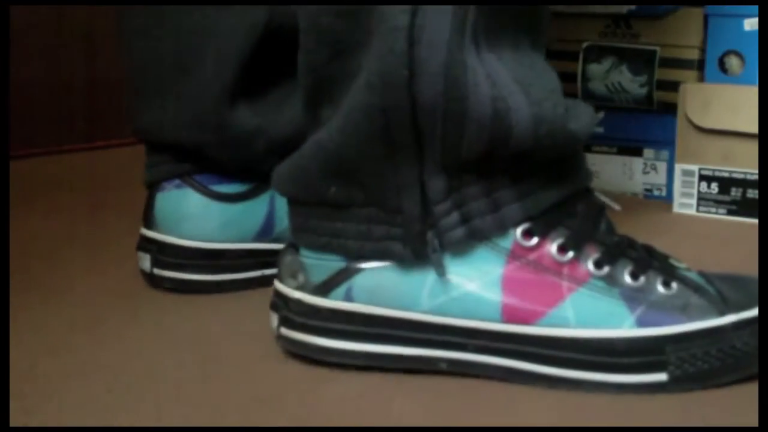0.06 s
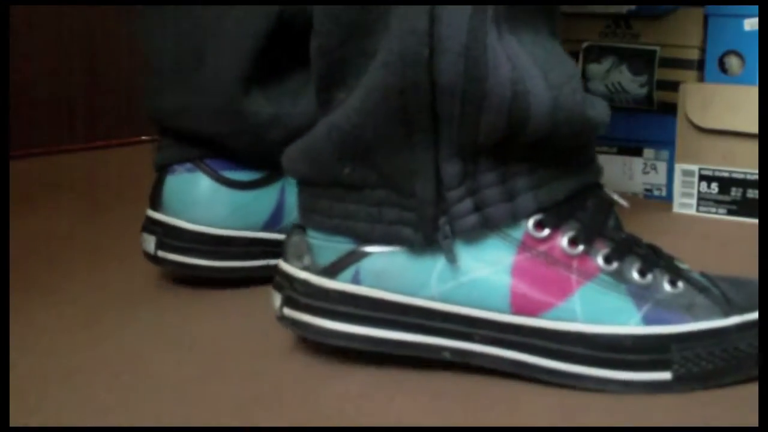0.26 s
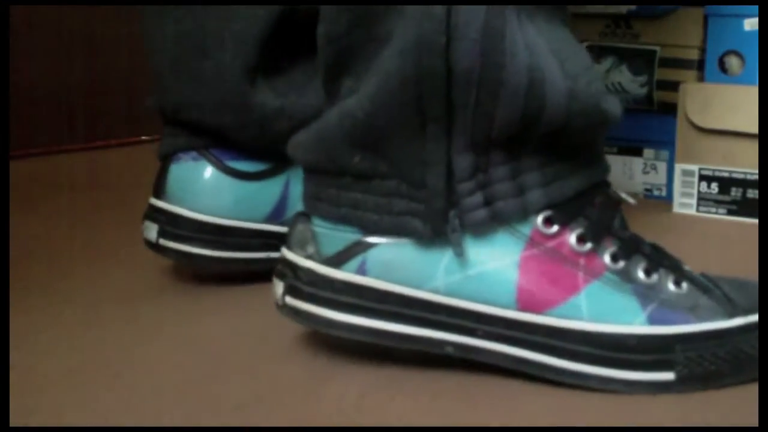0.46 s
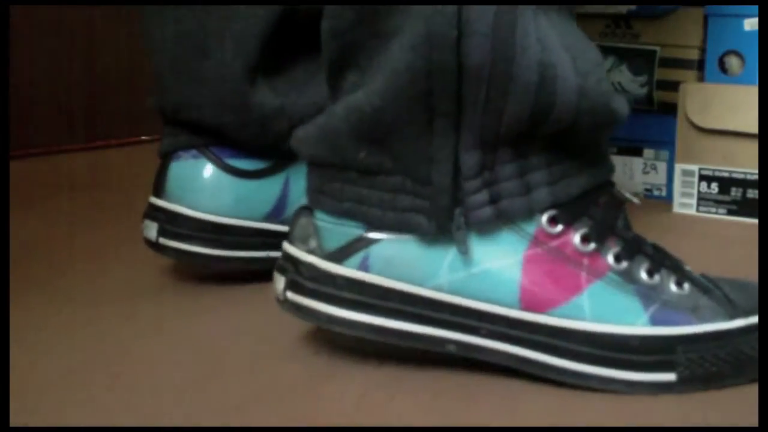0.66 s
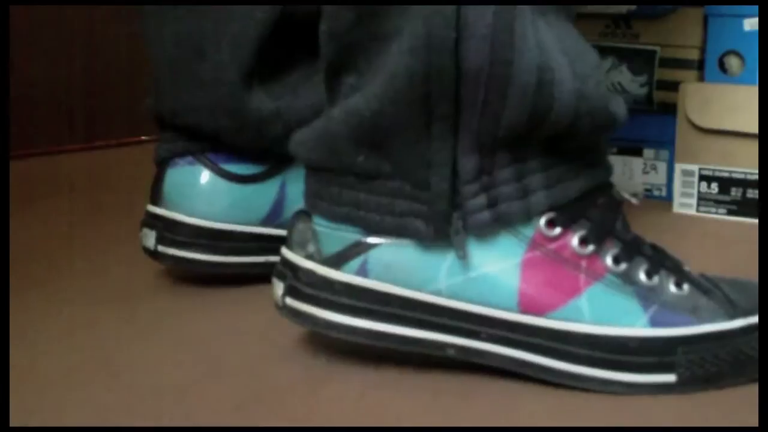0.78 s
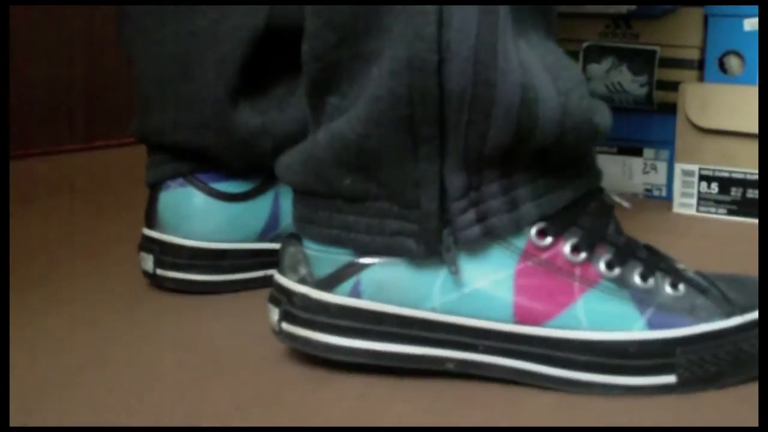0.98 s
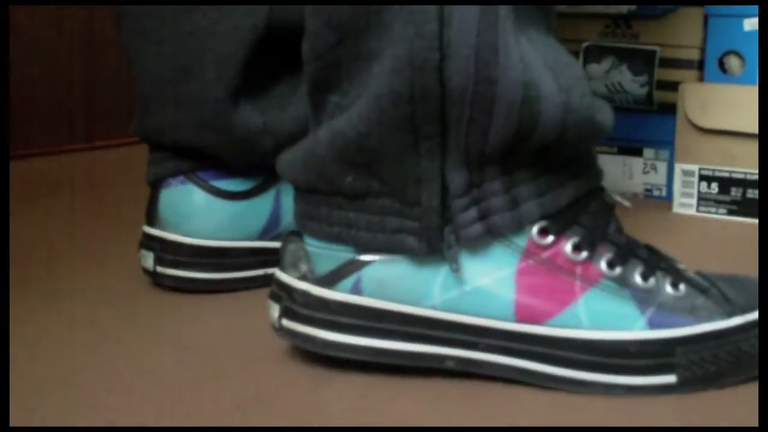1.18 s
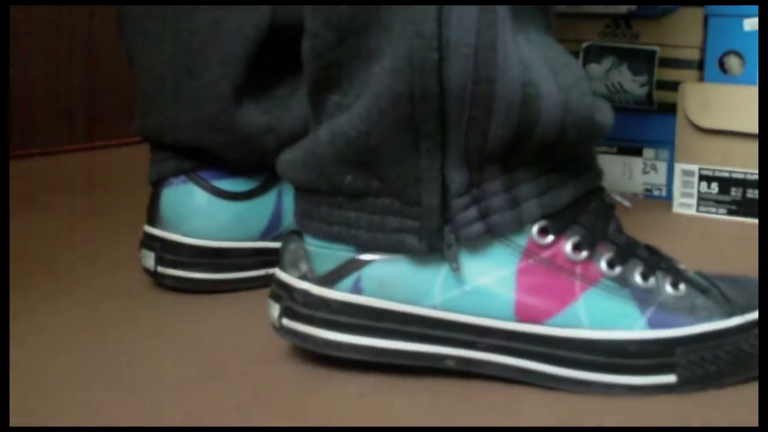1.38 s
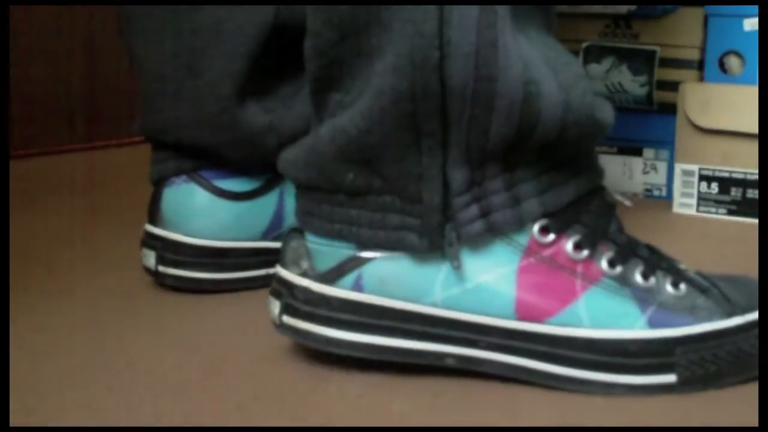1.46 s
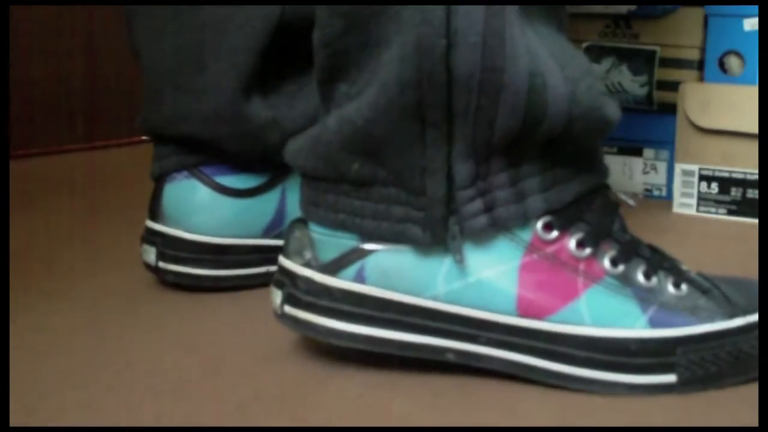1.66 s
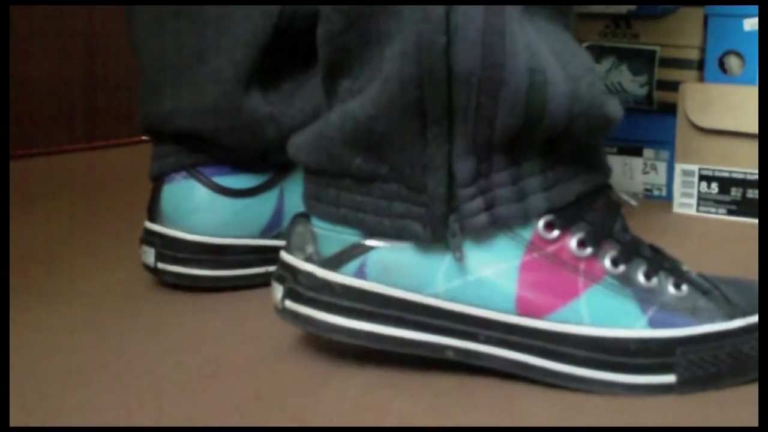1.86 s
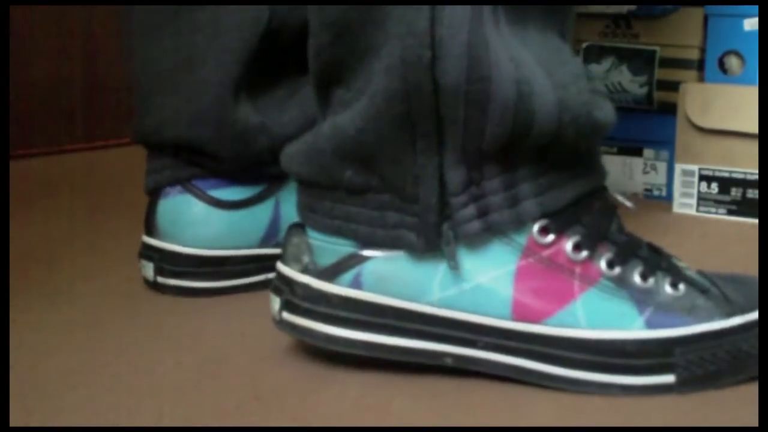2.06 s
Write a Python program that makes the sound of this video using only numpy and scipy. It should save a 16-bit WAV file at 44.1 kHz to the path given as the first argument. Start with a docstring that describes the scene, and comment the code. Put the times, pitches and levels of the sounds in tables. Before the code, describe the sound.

Rubber-soled shoes creak and scuff on a hard floor, with one loud early heel knock.

```python
"""A small room with a hard floor: rubber-soled shoes shift about, close to a small camera microphone.
The sole slips in short bursts of clicks that ring sole and floor; a heel lands and rattles, with knocks around it.
Dust crunches as tiny cracks of noise, and rubber gives thin squeaks made of gliding tones.
The room answers with a short noise-like tail, over steady coloured hiss and faint regular ticks."""
import sys
import numpy as np
from scipy import signal
from scipy.fft import rfft, irfft
from scipy.io import wavfile
from scipy.ndimage import uniform_filter1d

SR = 44100
rng = np.random.default_rng(int(sys.argv[2]) if len(sys.argv) > 2 else 0)


def dump_mix(stems):
    """Bounce the given channels to the path in sys.argv[1] as a 16-bit WAV at rate SR."""
    frames = np.atleast_2d(stems).T  # one column per channel
    limited = np.clip(frames, -1, 1)  # hard clip at full scale
    pcm = np.round(limited * 32767).astype(np.int16)
    wavfile.write(sys.argv[1], SR, pcm)


def amplitude_ratio(level_db):
    """Convert a level in decibels to the matching linear amplitude (field) ratio."""
    exponent = np.asarray(level_db, float) / 20
    return 10 ** exponent


N = 92610  # length of the scene [samples]

# ringing modes of sole and floor: (frequency [Hz], relative level [dB], time to fall by 60 dB [s])
SOLE_MODES = [(438, -20.5, 0.04), (600, -11, 0.021), (700, -9.5, 0.019), (808, -1, 0.023), (913, 2, 0.014),
              (1064, -4, 0.027), (1241, 6.5, 0.015), (1431, 3, 0.019), (1552, -12.5, 0.057),
              (1858, 7.5, 0.011), (2215, -0.5, 0.019), (2597, 0.5, 0.015), (2940, 6, 0.0071),
              (3407, -3.5, 0.013), (3887, -2, 0.01), (4604, -11, 0.011), (4760, -10, 0.0039)]
GAP_JITTER = 0.5  # unevenness of the gaps between slips or cracks (spread of their natural log)


def unit(x):
    """Scale a signal to rms 1."""
    return x / np.sqrt(np.mean(x ** 2))


def walk(rate):
    """Random level, rms 1, that glides to a new value about rate times a second."""
    hold = int(SR / rate)
    steps = np.repeat(rng.standard_normal(N // hold + 1), hold)
    return unit(uniform_filter1d(steps, hold)[:N])


def decay(t, t60):
    """Exponential fade that falls by 60 dB in t60 seconds."""
    return np.exp(-np.log(1000) * t / t60)


def add(out, start_s, x):
    """Mix x into out from start_s."""
    i = max(int(start_s * SR), 0)
    out[i:i + len(x)] += x[:len(out) - i]


def hiss():
    """Steady noise of room and microphone, coloured by weighting its spectrum."""
    # colour of the hiss: (frequency [Hz], relative level [dB])
    colour = [(24, -51), (59, -38.5), (122, -19), (160, -19.5), (227, -8.5), (373, -6), (502, -3),
              (746, -2.5), (888, 1.5), (1350, -2.5), (2110, -9), (4560, -18.5), (11100, -25.5),
              (15000, -36)]
    level_db = -59  # rms
    hz, db = np.array(colour).T
    f = np.maximum(np.arange(N // 2 + 1) * SR / N, 1)
    weight = amplitude_ratio(np.interp(np.log(f), np.log(hz), db))
    noise = irfft(rfft(rng.standard_normal(N)) * weight, N)
    return unit(noise) * amplitude_ratio(level_db)


def ticks():
    """The camera's electronics tick regularly for a while: short fading bits of treble noise."""
    ticks_per_s, first_s, count = 30, 0.3747, 34
    level_db, scatter_db, t60_s = -63.5, 1.5, 0.0088  # level before the band filter
    out, t = np.zeros(N), np.arange(512) / SR
    for k in range(count):
        gain = amplitude_ratio(level_db + scatter_db * rng.standard_normal())
        noise = rng.standard_normal(len(t))
        add(out, first_s + k / ticks_per_s, gain * noise * decay(t, t60_s))
    band = signal.butter(2, [7000, 11900], "band", fs=SR, output="sos")  # Hz
    return signal.sosfilt(band, out)


def room(x):
    """Sound plus the small room's answer: a diffuse tail of noise whose treble dies sooner."""
    level_db, rise_s = -7.5, 0.0031
    low_t60_s, treble_t60_s, split_hz = 0.2, 0.18, 4400
    t = np.arange(SR // 2) / SR
    noise = rng.standard_normal(len(t))
    low = signal.sosfilt(signal.butter(2, split_hz, fs=SR, output="sos"), noise)
    tail = low * decay(t, low_t60_s) + (noise - low) * decay(t, treble_t60_s)
    tail = tail * np.clip(t / rise_s, 0, 1)
    # energy of noise fading at the low rate, so the tail has an energy near 1
    energy = np.mean(noise ** 2) * low_t60_s * SR / np.log(1e6)
    return x + amplitude_ratio(level_db) * signal.fftconvolve(x, tail / np.sqrt(energy))[:N]


def grit():
    """Dust crunches under the sole: tiny bright cracks at uneven moments, fading through each patch."""
    # patches: (start [s], length [s], crack level before the band filter [dB], top frequency [Hz])
    patches = [(0.054, 0.022, -53, 7000), (0.201, .02, -45, 7500), (0.992, 0.017, -68, 11600),
               (1.205, 0.03, -50, 8900), (1.24, 0.043, -56.5, 7950)]
    cracks_per_s, scatter_db, low_hz, t60_s = 400, 1, 3860, 0.025  # rate before the uneven gaps
    out, t = np.zeros(N), np.arange(1024) / SR
    for start, length, db, top_hz in patches:
        gaps = np.exp(GAP_JITTER * rng.standard_normal(32))
        when = (np.cumsum(gaps) - 1) / cracks_per_s
        band = signal.butter(2, [low_hz, top_hz], "band", fs=SR, output="sos")
        for late in when:
            gain = amplitude_ratio(db + scatter_db * rng.standard_normal()) * np.exp(-(late / length) ** 4)
            crack = gain * rng.standard_normal(len(t)) * decay(t, t60_s)
            add(out, start + late, signal.sosfilt(band, crack))
    return out


def squeaks():
    """Rubber squeaks: thin whistles that glide a little, with a fluttering level."""
    # squeaks: (start [s], length [s], from [Hz], to [Hz], rms level before flutter and edges [dB])
    whistles = [(0.002, 0.04, 6260, 6245, -66), (0.044, 0.011, 7070, 7250, -59),
                (0.048, 0.01, 4014, 4084, -47.5), (0.614, 0.018, 2850, 2880, -66),
                (0.938, 0.039, 4350, 3830, -68.5), (1.169, 0.016, 3630, 3720, -67.5),
                (1.236, 0.042, 9270, 9243, -67.5)]
    edge_s = 0.005  # fade in and out
    out = np.zeros(N)
    flutter = amplitude_ratio(4 * walk(240))  # spread of 4 dB
    wobble = 0.4 * walk(250)  # as a share of the glide
    for start, length, from_hz, to_hz, db in whistles:
        t = np.arange(int(length * SR)) / SR
        hz = from_hz + (to_hz - from_hz) * (t / length + wobble[:len(t)])
        edge = np.clip(np.minimum(t, length - t) / edge_s, 0, 1)
        tone = np.sqrt(2) * np.sin(2 * np.pi * np.cumsum(hz) / SR)
        add(out, start, amplitude_ratio(db) * edge * tone)
    return out * flutter


def ring(centre_hz, others_db):
    """Sole and floor answer one push, with unit energy; modes near centre_hz speak loudest."""
    favour_oct = 0.33  # width of the favoured group of modes [octaves]
    phase_spread = 1.407  # each contact point starts the modes differently [rad]
    rise_s, low_hz = 0.0013, 381  # rubber pushes softly; the small sole radiates no bass
    hz, db, t60 = np.array(SOLE_MODES).T[:, :, None]
    t = np.arange(4096) / SR
    favour = np.exp(-0.5 * (np.log2(hz / centre_hz) / favour_oct) ** 2)
    gain = amplitude_ratio(db) * (favour + amplitude_ratio(others_db))
    phase = 2 * np.pi * hz * t + phase_spread * rng.standard_normal(hz.shape)
    body = np.sum(gain * decay(t, t60) * np.sin(phase), axis=0)
    body = body * np.sin(np.pi / 2 * np.clip(t / rise_s, 0, 1)) ** 2
    body = signal.sosfilt(signal.butter(4, low_hz, "high", fs=SR, output="sos"), body)
    return body / np.sqrt(np.sum(body ** 2))


def creaks():
    """The sole sticks and slips: uneven slips start at full strength, hold and fade, and each rings the modes."""
    # bursts: (start [s], length [s], level [dB], favoured pitch [Hz], level of the other modes [dB])
    bursts = [(0.000, 0.014, -36.5, 1390, -11.5), (0.0446, 0.027, -42, 3300, -4),
              (0.065, 0.027, -47.5, 1420, -9), (0.1176, 0.023, -44.5, 1270, -23),
              (0.1978, 0.014, -29.5, 2970, -4), (0.219, 0.011, -36.5, 1500, -2),
              (0.246, 0.015, -42, 1400, -15), (0.272, 0.027, -38, 1320, -16), (0.311, 0.02, -41, 1285, -19),
              (0.401, 0.015, -55.5, 1170, -11), (0.61, 0.003, -53.5, 1090, -23),
              (0.627, 0.016, -52.5, 960, -24), (0.645, 0.0085, -54.5, 504, -27),
              (0.759, 0.011, -55.5, 500, -29), (0.7855, 0.019, -38.5, 1340, -14),
              (0.9785, 0.02, -42, 1350, -14), (0.9785, .014, -48, 3300, -12), (1.011, 0.012, -57, 1320, 2),
              (1.03, 0.012, -49.5, 1240, -6), (1.046, 0.044, -47.5, 1045, -12),
              (1.097, 0.023, -51, 990, -19), (1.13, 0.045, -53.5, 1100, -8.5),
              (1.183, 0.029, -55.5, 1240, -5), (1.207, 0.022, -38.5, 2900, -3),
              (1.236, 0.023, -39.5, 1430, -2), (1.265, 0.032, -46, 1320, -10.5),
              (1.307, 0.0052, -48.5, 1260, -7)]
    slips_per_s, scatter_db = 620, 2  # rate before the uneven gaps
    attack_s, release_s = 0.002, 0.008
    out = np.zeros(N)
    for start, length, db, hz, others_db in bursts:
        gaps = np.exp(GAP_JITTER * rng.standard_normal(64))
        t = np.clip((np.cumsum(gaps) - 1) / slips_per_s, 0, 0.15)
        swell = np.clip((t + 0.0028) / attack_s, 0, 1)
        fade = np.exp(-np.maximum(t - length, 0) / release_s)
        size = amplitude_ratio(scatter_db * rng.standard_normal(64))
        direction = np.sign(rng.standard_normal(64))
        slips = np.zeros(8192)
        np.add.at(slips, (t * SR).astype(int), swell * fade * size * direction)
        burst = signal.fftconvolve(slips, ring(hz, others_db))
        # the level is an rms over the length plus half the release
        loudness = np.sqrt((length + release_s / 2) * SR / np.sum(burst ** 2))
        add(out, start, amplitude_ratio(db) * burst * loudness)
    return out


def heel():
    """Knocks of the sole, with the heel landing and rattling at 0.2 s; each rings modes and thuds the floor."""
    # knocks: (time [s], peak level of the ring [dB], favoured pitch [Hz], level of the other modes [dB])
    knocks = [(0.0478, -28, 1660, -12), (0.0509, -24.5, 1620, -21), (0.061, -34, 1410, -15),
              (0.1967, -21.5, 1270, -19), (0.1998, -8, 1210, -20), (0.2028, -5.5, 930, -30.5),
              (0.2070, -11, 1050, -10.5), (0.2140, -16, 850, -12), (0.2180, -22, 1100, -13),
              (0.224, -16, 1400, -13), (0.2330, -18, 1220, -26), (0.6180, -37.5, 840, -25),
              (0.6520, -39.5, 600, -45), (0.7530, -41.5, 800, -20), (0.7665, -45, 560, -33),
              (0.7890, -37, 1200, -14), (0.9959, -30, 1280, -33), (1.0470, -37, 1180, -15),
              (1.1710, -42, 1260, -6), (1.2125, -24.5, 805, -10), (1.2262, -26.5, 856, -14.5),
              (1.2480, -30, 1480, -23), (1.346, -52.5, 1240, 2)]
    thud_hz, thud_db, thud_t60_s = 139.5, -40, 0.036  # level relative to the knock
    out, t = np.zeros(N), np.arange(8192) / SR
    thud = amplitude_ratio(thud_db) * decay(t, thud_t60_s) * np.sin(2 * np.pi * thud_hz * t)
    for start, db, hz, others_db in knocks:
        body = ring(hz, others_db)
        add(out, start, amplitude_ratio(db) * body / np.max(np.abs(body)))
        add(out, start, amplitude_ratio(db) * thud)
    return out


def scene():
    """Shoes sounding in the room, over the hiss and ticks, as one channel."""
    shoes = creaks() + heel() + grit() + squeaks()
    return (room(shoes) + hiss() + ticks())[None]


def top_cut(x):
    """Nothing passes above the cut-off."""
    return signal.sosfilt(signal.butter(12, 15170, fs=SR, output="sos"), x)


def record(dry):
    """The camera cuts the top of the treble with a steep low-pass filter."""
    top_hz = 15170
    cut = signal.sosfilt(signal.ellip(8, 0.2, 70, top_hz, fs=SR, output="sos"), dry)
    return top_cut(cut)


dry = scene()
out = record(dry)
dump_mix(out)
```